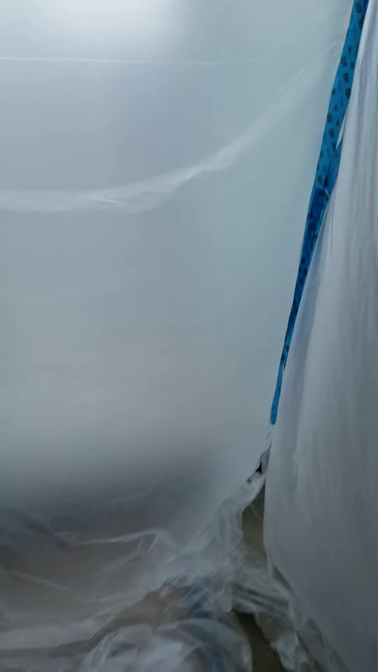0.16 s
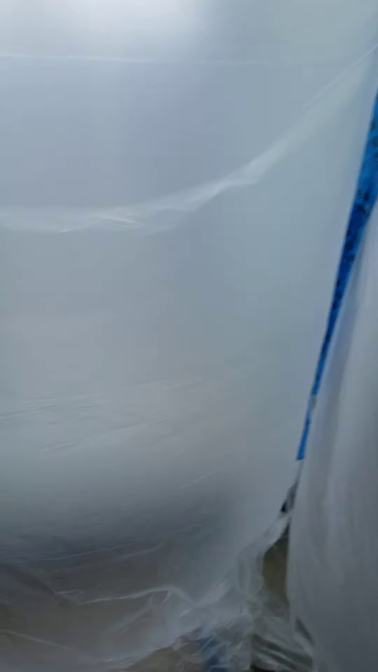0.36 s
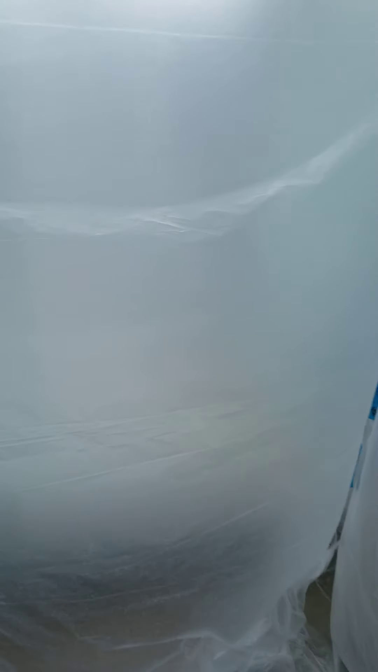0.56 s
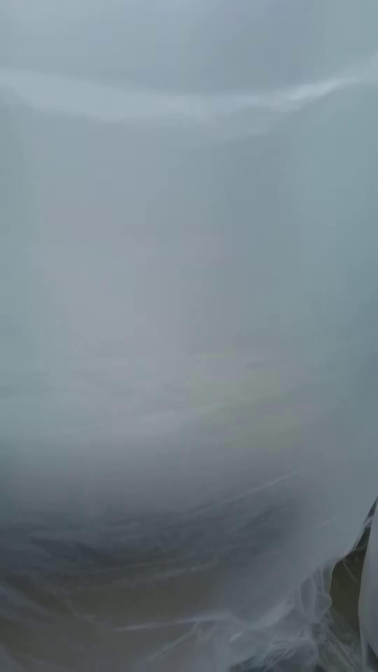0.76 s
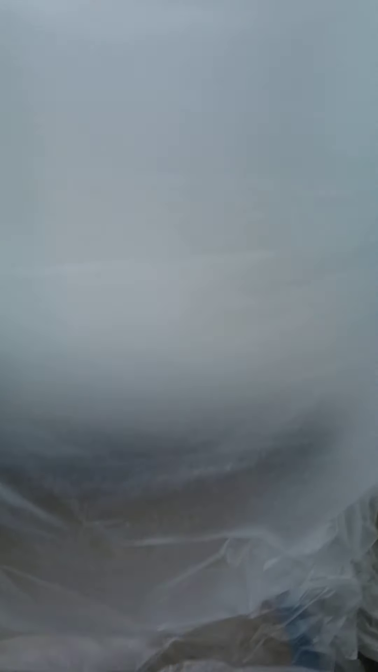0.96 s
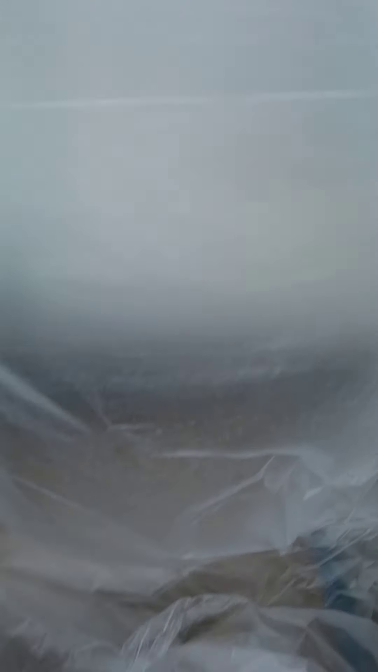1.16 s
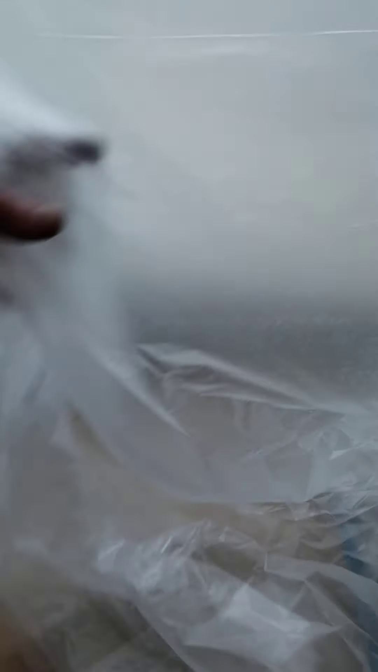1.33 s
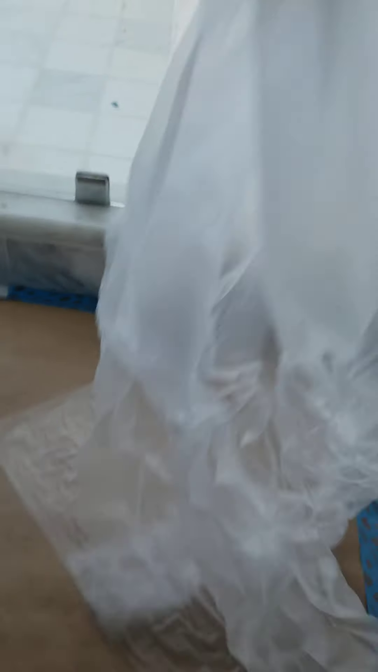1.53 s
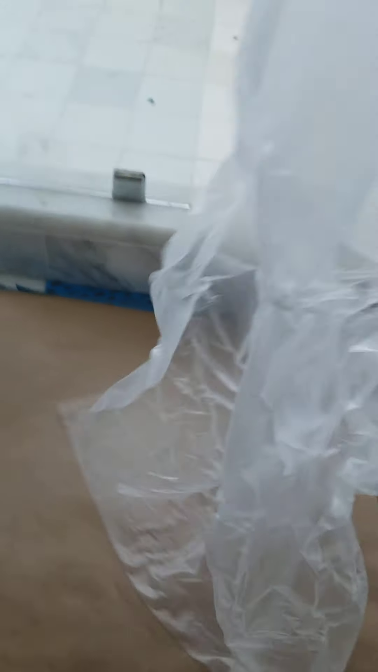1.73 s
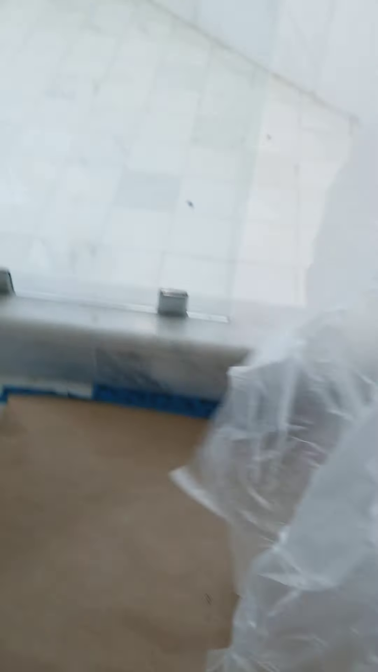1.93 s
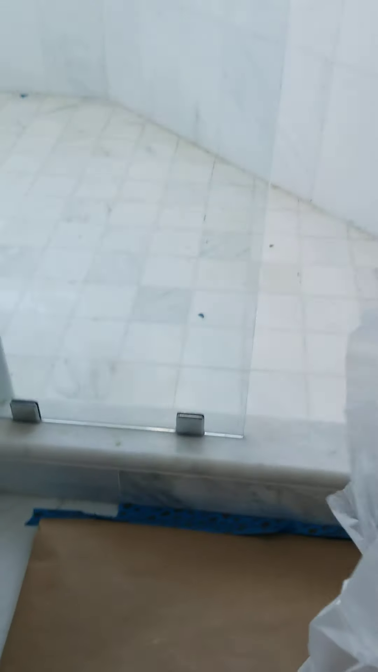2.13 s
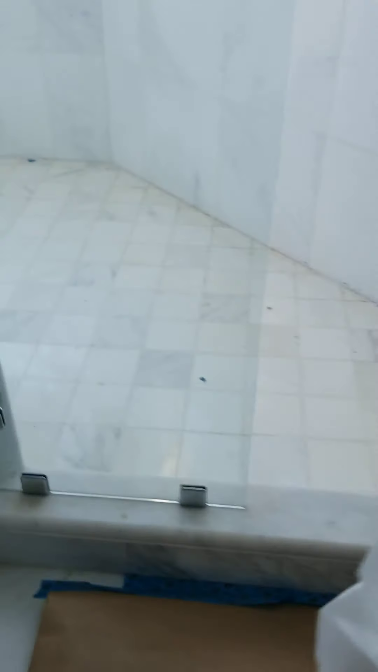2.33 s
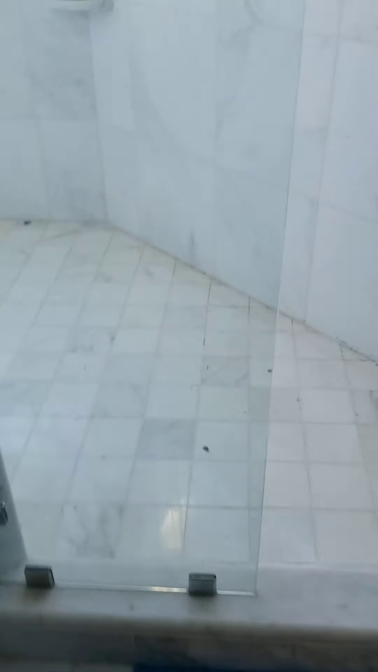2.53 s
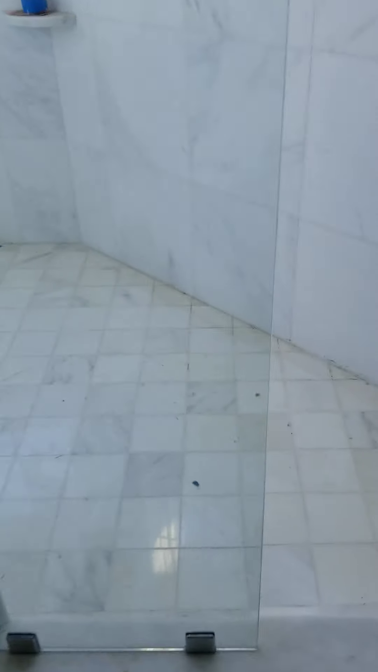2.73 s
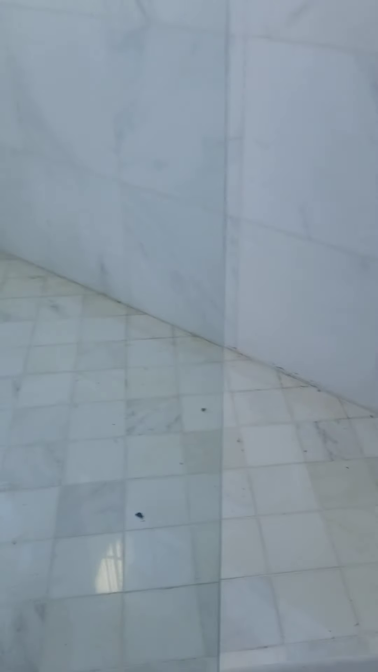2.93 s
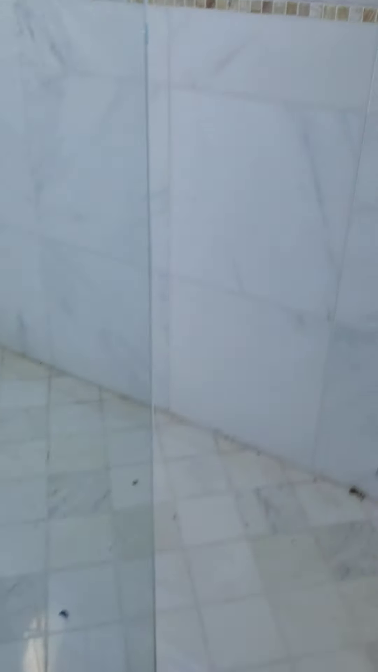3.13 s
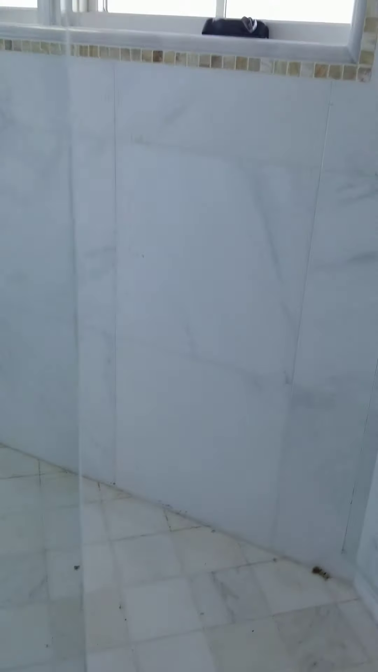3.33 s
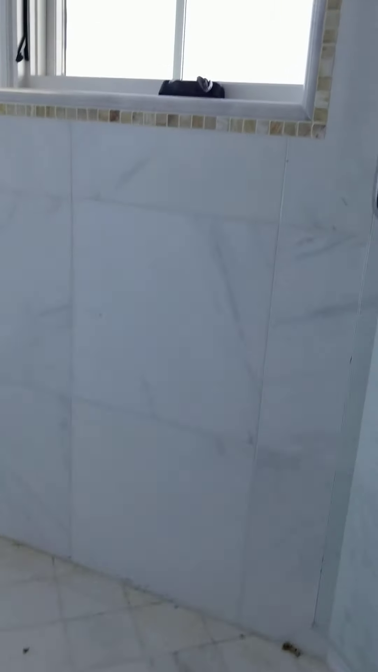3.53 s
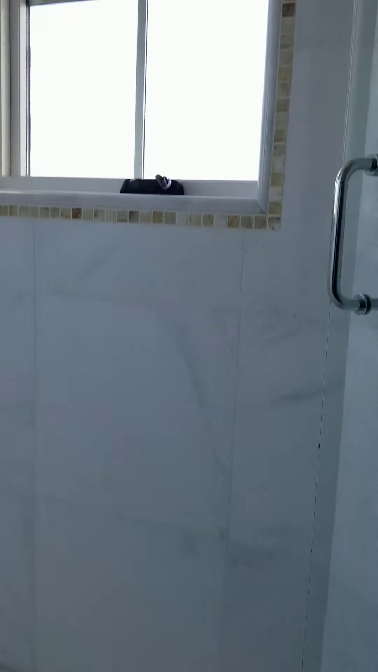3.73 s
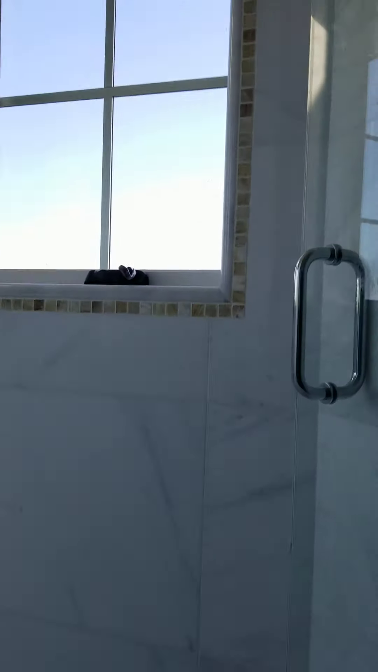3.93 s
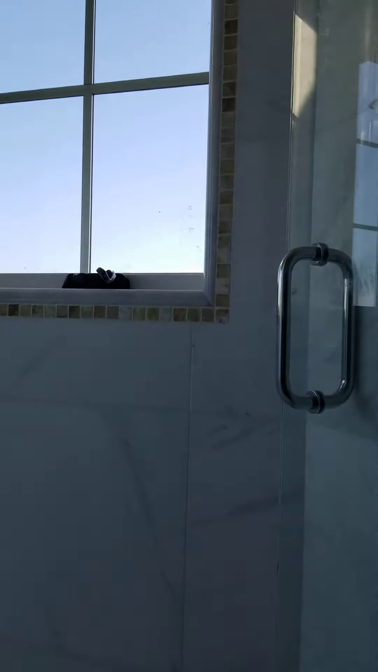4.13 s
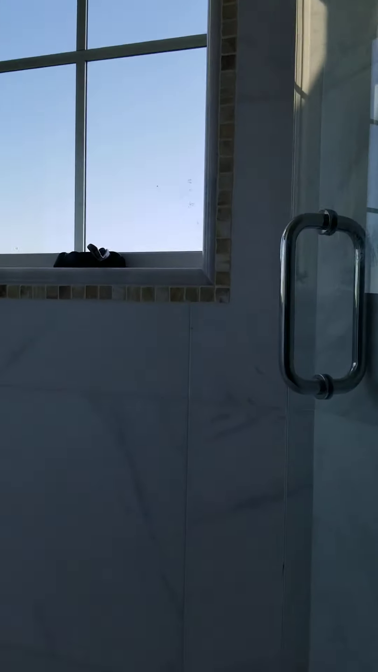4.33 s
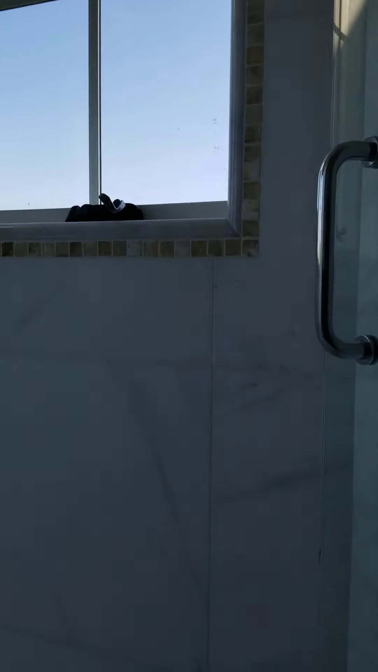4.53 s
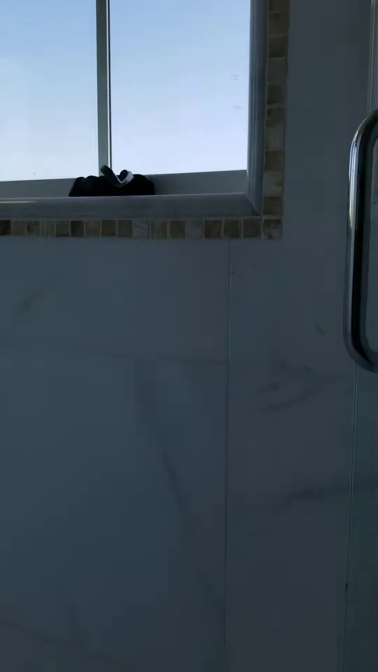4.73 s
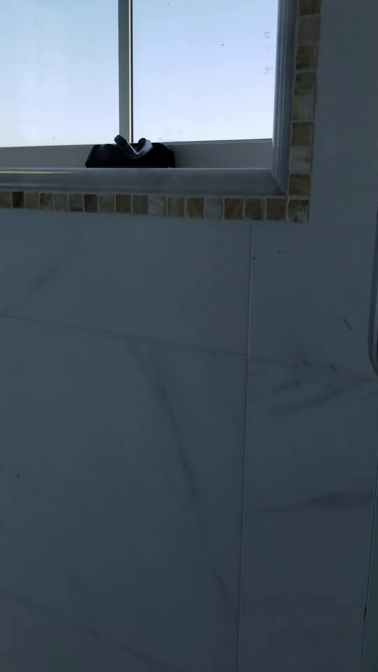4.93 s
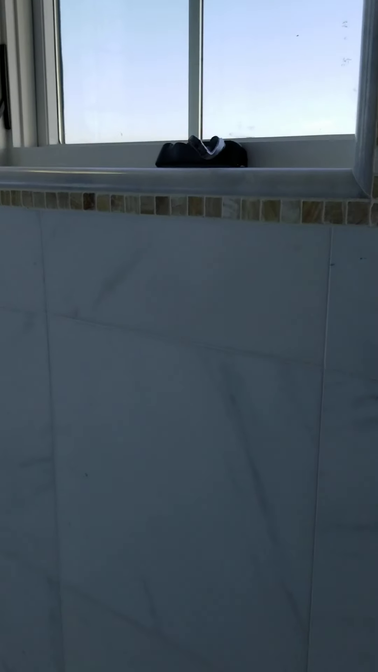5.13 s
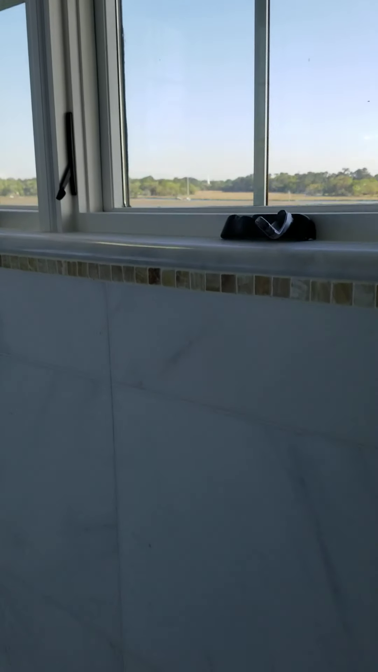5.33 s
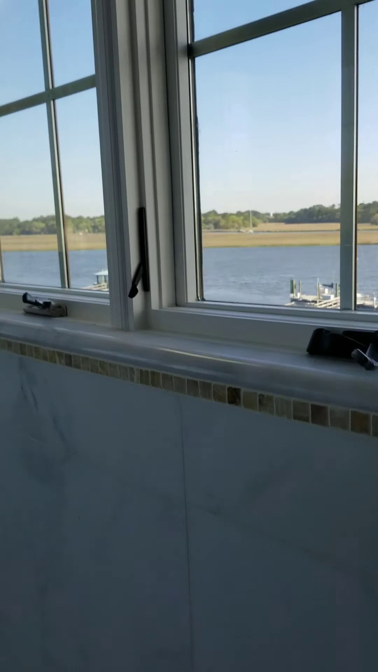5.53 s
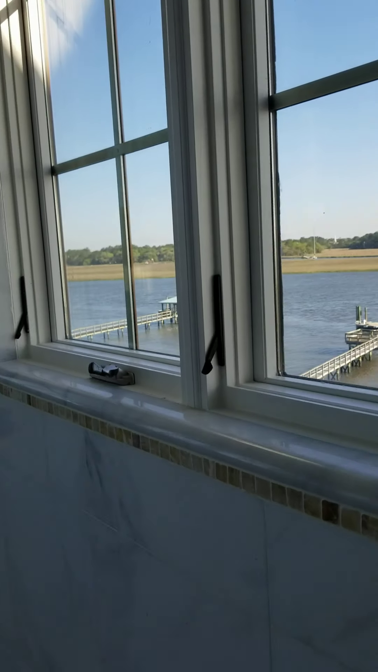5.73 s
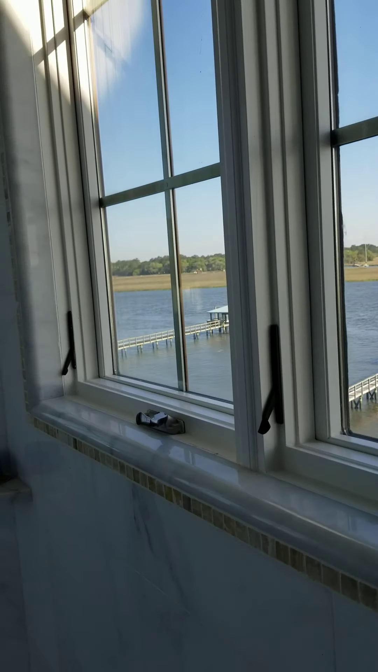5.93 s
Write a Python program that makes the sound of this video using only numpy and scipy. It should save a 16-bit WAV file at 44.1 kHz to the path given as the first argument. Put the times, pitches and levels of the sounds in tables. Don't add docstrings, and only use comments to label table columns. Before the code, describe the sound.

Thin plastic sheeting crackles densely and knocks against a phone as it is pushed aside in a tiled room, then settles with faint rustles.

```python
import sys
import numpy as np
from scipy import signal
from scipy.fft import rfft, irfft, next_fast_len
from scipy.io import wavfile
from scipy.ndimage import uniform_filter1d

SR = 44100
rng = np.random.default_rng(int(sys.argv[2]) if len(sys.argv) > 2 else 0)


def dump_mix(stems):
    frames = np.atleast_2d(stems).T
    limited = np.clip(frames, -1, 1)
    pcm = np.round(limited * 32767).astype(np.int16)
    wavfile.write(sys.argv[1], SR, pcm)


def nominal_scale(level):
    x = np.asarray(level, float) / 20
    return 10 ** x


N = 267758

# pitch in Hz, width in Hz, level in dB, left minus right in dB.
CASE = [
    (490, 90, -2, 3),
    (870, 80, -2, 0),
    (1240, 100, -1, -6),
]
# start in seconds, level in dB, hold in seconds,
# left minus right in dB.
BRUSHES = [(0.86, -58, 0.022, 2), (1.62, -46.5, 0.1, 3), (2.172, -34.5, 0.02, -0.5), (2.21, -37, 0.055, 0),
           (2.66, -29.5, 0.069, 16), (2.8, -37.5, 0.047, 9), (3.31, -44, 0.0094, 7), (4.68, -65, 0.29, -20),
           (5.39, -53, 0.027, 6), (5.73, -54, 0.07, -9)]
BRUSH_RISE_DB_S, BRUSH_FALL_DB_S = 800, 190


def unit(x):
    return x / np.sqrt(np.mean(x ** 2))


def curves(table):
    s, *columns = np.transpose(table)
    t = np.arange(N) / SR
    return [np.interp(t, s, column) for column in columns]


def sides(pan_db):
    return nominal_scale(np.array([pan_db, -pan_db]) / 2)


def colour(x, hz, db):
    size = next_fast_len(N)
    f = np.maximum(np.arange(size // 2 + 1) * SR / size, 1)
    gain = nominal_scale(np.interp(np.log(f), np.log(hz), db))
    gain = gain * np.minimum(f / hz[0], 1) ** 2 * np.minimum(hz[-1] / f, 1) ** 2
    return irfft(rfft(x, size) * gain, size)[..., :N]


def walk(rate_hz):
    k = int(SR / rate_hz)
    steps = np.repeat(rng.standard_normal(N // k + 1), k)
    return 1.18 * uniform_filter1d(uniform_filter1d(steps, k), k)[:N]


def creases(rate_hz, spread_db):
    when = rng.random((2, N))
    sign = rng.standard_normal((2, N))
    size = rng.exponential(size=(2, N))
    return unit((when < rate_hz / SR) * sign * nominal_scale(spread_db * size))


def ring(hz, width_hz, length):
    t = np.arange(length) / SR
    blow = np.minimum(t * hz * 1.1, 1)
    return np.sin(2 * np.pi * hz * t) * np.exp(-np.pi * width_hz * t) * blow


def add(out, s, sound):
    i = int(s * SR)
    out[:, i:i + sound.shape[-1]] += sound[..., :N - i]


def swells(table, rise_db_s, fall_db_s):
    s, db, hold_s, last = np.transpose(table)[:, :, None]
    t = np.arange(N) / SR
    before_s = np.maximum(s - t, 0)
    after_s = np.maximum(t - s - hold_s, 0)
    return nominal_scale(db - rise_db_s * before_s - fall_db_s * after_s), last


def placed(table, rise_db_s, fall_db_s):
    gains, pan_db = swells(table, rise_db_s, fall_db_s)
    return (gains * sides(pan_db)).sum(axis=1)


def house():
    # time in seconds, level in dB.
    hum = [(0.0, -59.5), (0.2, -53.5), (0.55, -55.5), (0.75, -71), (1.5, -68), (2.42, -54), (3.0, -60),
           (3.85, -57), (4.2, -62.5), (4.8, -56.5), (6.07, -54)]
    # frequency in Hz, level in dB.
    hum_colour = [(20, -32), (45, -20), (80, -18), (112, -11), (126, -2), (142, 0), (158, -12), (220, -17),
                  (340, -19), (450, -32)]
    level_db, = curves(hum)
    mid, side = colour(rng.standard_normal((2, N)), *np.transpose(hum_colour))
    ports = mid + 0.068 * side * np.array([[1], [-1]])
    return unit(ports) * nominal_scale(level_db + 1.5 + 1.0 * walk(9.8))


def quiet():
    # frequency in Hz, density in dB per Hz.
    quiet_colour = [(240, -33), (400, -14), (496, -22), (889, -26), (931, -19), (1190, -10), (1590, -1),
                    (2600, 0.5), (3130, -15), (3880, -6), (9170, -14), (12100, -23), (15700, -28)]
    noise = colour(rng.standard_normal((2, N)), *np.transpose(quiet_colour))
    return unit(noise) * nominal_scale(-65.5) * sides(-4.5)[:, None]


def draught():
    # start in seconds, level in dB, hold in seconds, left minus right in dB.
    gusts = [(0.85, -54.5, 0.15, -2), (1.2, -62, 0.03, -3), (1.66, -47, 0.03, 8), (1.76, -43.5, 0.16, 7),
             (2.02, -52, 0.0092, 13), (2.175, -39.5, 0.015, 2), (2.42, -59, 0.024, 10),
             (2.68, -32, 0.037, 1.5), (2.9, -51, 0.018, 9), (3.32, -49, 0.02, 7), (3.61, -58, 0.0091, 14),
             (5.2, -64, 0.018, 6), (5.62, -54, 0.01, 4)]
    # frequency in Hz, level in dB.
    draught_colour = [(15, -21), (40, 2.5), (70, 5), (130, -0.5), (240, -12.5), (380, -15.5)]
    still = nominal_scale(np.where(np.arange(N) / SR < 3.8, -61.5, -59.5))
    gain = still + placed(gusts, rise_db_s=300, fall_db_s=177)
    noise = colour(rng.standard_normal((2, N)), *np.transpose(draught_colour))
    return unit(noise) * nominal_scale(2.0 * walk(30)) * gain


def puffs():
    # time in seconds, push in dB, suction before it in dB, push length in ms.
    puff_rows = [(1.861, -32, -25, 5.8), (1.938, -28, -29, 5.1), (3.76, -27.5, -29, 5),
                 (3.868, -26, -23, 4.1), (3.935, -31.5, -33, 5.3), (4.521, -28, -34, 4),
                 (5.389, -27.5, -30, 4.6), (5.677, -27.5, -23, 4.1)]
    out = np.zeros((2, N))
    t = np.arange(-1500, 1500) / SR
    for s, push_db, suck_db, push_ms in puff_rows:
        u = t / (push_ms / 2000)
        push = np.exp(-np.abs(u / 1.4) ** 3) * (1 - .15 * u)
        suck = np.exp(-((u + 1.52) / np.where(u < -1.4, 1.3, .4)) ** 2)
        rebound = np.exp(-((u - 2.1) / np.where(u > 2.1, 2.2, .7)) ** 2)
        puff = nominal_scale(push_db) * (push - 0.72 * rebound) - nominal_scale(suck_db) * suck
        add(out, s + t[0], puff * np.array([[1], [.05]]))
    return out


def slides():
    # start in seconds, level in dB, hold in seconds, pitch in Hz.
    slide_rows = [
        (0.52, -59, 0.21, 960),
        (1.63, -46, 0.11, 870),
        (2.18, -48, 0.08, 1290),
        (4.58, -46.5, 0.23, 1282),
        (4.86, -51.5, 0.32, 1250),
        (5.72, -55, 0.25, 1280),
    ]
    gains, pitch_hz = swells(slide_rows, rise_db_s=300, fall_db_s=250)
    grains = creases(4000, 1.1) * nominal_scale(0.8 * walk(30))
    case = sum(nominal_scale(db) * ring(hz, width_hz, 1500) for hz, width_hz, db, _ in CASE)
    case = case + ring(1580, 110, 1500)
    out = np.zeros((2, N))
    for gain, hz in zip(gains, pitch_hz[:, 0]):
        note = ring(hz, 55, 1500) + nominal_scale(-5) * case
        out += gain * unit(signal.fftconvolve(grains, note[None], axes=1)[:, :N])
    return out


def knocks():
    # time in seconds, peak in dB, pitch in Hz, left minus right in dB.
    knock_rows = [(1.603, -42, 864, 1), (1.6235, -25, 516, 4), (1.642, -28, 890, 1), (1.688, -25, 877, 9),
                  (1.7212, -25, 870, 5), (1.734, -23.5, 850, -5), (1.7482, -28, 503, 3),
                  (2.17, -17, 475, -1), (2.181, -24, 476, 1), (2.189, -21, 850, 2), (2.193, -15.5, 840, -6),
                  (2.217, -23, 640, 9), (2.24, -22.5, 830, -4), (2.247, -23, 1240, 2), (2.255, -28, 430, 6),
                  (2.654, -31, 656, 10), (2.684, -23, 740, 8), (2.695, -21, 160, 3), (2.718, -17, 147, 0),
                  (2.786, -18.5, 765, 13), (2.854, -27.5, 487, 21), (3.303, -26, 1110, 10),
                  (5.399, -36, 485, -9)]
    out = np.zeros((2, N))
    case = sum(nominal_scale(db) * sides(pan_db)[:, None] * ring(hz, width_hz, 1500) for hz, width_hz, db, pan_db in CASE)
    thud = ring(570, 800, 1500)
    for s, db, hz, pan_db in knock_rows:
        fold = ring(hz, 0.081 * hz + 30, 1500)
        blow = 1.02 * fold + 0.43 * case + 2.2 * thud
        add(out, s + 0.00154, nominal_scale(db - 3.0) * sides(pan_db)[:, None] * blow)
    return out


def snaps():
    # time in seconds, peak in dB, pitch in Hz, left minus right in dB.
    snap_rows = [
        (0.1629, -53, 1900, -5),
        (0.3236, -44, 11800, -17),
        (0.7738, -25.5, 2160, -7),
        (5.212, -37, 1890, -4.0),
        (5.519, -39, 2070, 0),
    ]
    out = np.zeros((2, N))
    for s, db, hz, pan_db in snap_rows:
        spit = rng.standard_normal((2, 600)) * np.exp(-np.arange(600) / SR / 0.0027)
        second_hz = 0.81 * hz if hz < 5000 else 1.15 * hz
        pair = ring(hz, 280, 600) + 0.88 * ring(second_hz, 300, 600)
        add(out, s, nominal_scale(db) * sides(pan_db)[:, None] * (pair + .06 * spit))
    return out


def tiles(x):
    t60_s, tail_db = 0.34, -6.5
    t = np.arange(SR // 2) / SR
    tail = rng.standard_normal((2, len(t))) * np.exp(-np.log(1000) * t / t60_s) * (t > .004)
    tail /= np.sqrt(np.sum(tail ** 2, axis=1, keepdims=True))
    return x + nominal_scale(tail_db) * signal.fftconvolve(x, tail, axes=1)[:, :N]


def motion():
    # time in seconds, crackle level in dB,
    # nearness as treble lift in dB, bearing as left minus right in dB.
    pull_rows = [(1.04, -103, -5, -8), (1.121, -40.5, 0.5, -5), (1.39, -37, 1, -0.5), (1.81, -36, -0.5, 2),
                 (2.3, -38, -0.5, 1.5), (2.37, -33.5, 0.5, 1.5), (2.59, -32.5, 1, 1.5), (2.63, -36, 1.5, 0),
                 (2.93, -37.5, 2.5, -0.5), (3.05, -36.5, -1, -1.5), (3.27, -37.5, 1.5, -3.5),
                 (3.56, -38.5, -1.5, -1), (4.02, -43, -3.5, -5.5), (4.45, -43, 1, -7.5),
                 (4.76, -45.5, -5, -4.5), (5.07, -49, -4, -8), (5.5, -51.5, -4.5, -5), (6.07, -52, -7, -2)]
    # start in seconds, level in dB, hold in seconds, treble lift in dB.
    stir_rows = [(0.0, -56.5, 0.052, -11.5), (0.165, -65, 0.0038, -6), (0.375, -62, 0.0077, -3.5),
                 (0.46, -60, 0.057, -40), (0.64, -64, 0.049, -11), (0.715, -59, 0.086, -2.5),
                 (0.825, -50.5, 0.016, -8), (0.95, -64.5, 0.086, -2)]
    flurry_rows = [(1.595, -53, 0.038, 0), (1.93, -42, 0.027, -3.5), (2.69, -33, 0.04, -1),
                   (3.09, -42, 0.039, -3), (3.31, -38.5, 0.12, 0), (3.66, -53, 0.03, 3),
                   (4.61, -51, 0.017, -6), (5.2, -62, 0.15, 3.5), (5.5, -68, 0.035, -1),
                   (4.18, -62, 0.15, 1), (3.85, -51.5, 0.092, 2), (1.22, -56, 0.071, -1)]
    level_db, lift_db, bearing_db = curves(pull_rows)
    stirs, stir_lift_db = swells(stir_rows, rise_db_s=910, fall_db_s=86)
    flurries, flurry_lift_db = swells(flurry_rows, rise_db_s=498, fall_db_s=79)
    brushes = swells(BRUSHES, BRUSH_RISE_DB_S, BRUSH_FALL_DB_S)[0].sum(axis=0) * nominal_scale(-13.5)
    pull, stir = nominal_scale(level_db), stirs.sum(axis=0)
    bright = pull * nominal_scale(lift_db)
    bright = bright + (stirs * nominal_scale(stir_lift_db)).sum(axis=0)
    bright = bright + (flurries * nominal_scale(flurry_lift_db)).sum(axis=0)
    bright = bright + brushes * nominal_scale(-11)
    stir_bearing_db = -6.5
    bearing_db = (pull * bearing_db + stir * stir_bearing_db) / (pull + stir)
    return pull + stir + flurries.sum(axis=0), brushes, bright, bearing_db


def folds():
    # frequency in Hz, level in dB.
    fold_colour = [(120, -2.5), (250, 1), (370, -1.5), (490, -1), (640, -1.5), (860, -3.5), (1030, -6),
                   (1260, -4.5), (1500, -7.5), (3000, -21), (6000, -33)]
    moving = motion()[0]
    flex = nominal_scale(-12.5) * moving ** 0.86 * sides(0.4)[:, None]
    gain = flex + placed(BRUSHES, BRUSH_RISE_DB_S, BRUSH_FALL_DB_S) * nominal_scale(-4.5)
    clicks = creases(3000, 1.82)
    clicks = clicks + 0.48 * clicks[::-1]
    return unit(colour(clicks, *np.transpose(fold_colour))) * gain * nominal_scale(-1.5 + 1.0 * walk(24.9))


def sheet():
    # frequency in Hz, left in dB, right in dB.
    port_rows = [(870, -6, -10.5), (1490, -4.5, -5), (2340, -1.5, 1), (3450, -1, -3.5), (3770, -0.5, -1.5),
                 (5840, -3, -7), (7330, -9, -6.5), (7630, -1, -5.5), (8920, -11.5, -12.5),
                 (10460, -4.5, -1.5), (12620, -1.5, 4.5), (14350, 4, -6.5), (17400, 0, -2)]
    moving, brushes, bright, bearing_db = motion()
    hz, *port_db = np.transpose(port_rows)
    clicks = creases(15000, 0.56) * nominal_scale(0.82 * walk(9) + 0.41 * walk(60))
    heard = np.array([colour(click, hz, db) for click, db in zip(clicks, port_db)])
    body = signal.sosfiltfilt(signal.butter(3, 4300, fs=SR, output="sos"), heard)
    below = signal.sosfiltfilt(signal.butter(3, 8800, fs=SR, output="sos"), heard)
    edge = unit(below - body) * nominal_scale(-1.33 + 0.53 * walk(14))
    fine = unit(heard - below) * nominal_scale(5.5 + 0.51 * walk(30))
    large = unit(body) * (moving + brushes) + edge * bright
    large = large * sides(-3.5 + 0.33 * bearing_db)
    return nominal_scale(2.5) * (large + fine * bright * sides(bearing_db))


def scene():
    background = house() + quiet()
    air = draught() + puffs()
    blows = tiles(knocks() + snaps())
    return background + air + slides() + blows + folds() + sheet()


def top_cut(x):
    return signal.sosfilt(signal.butter(12, 17060, fs=SR, output="sos"), x)


def record(dry):
    low_pass = signal.ellip(10, .2, 75, 15750, fs=SR, output="sos")
    return top_cut(signal.sosfilt(low_pass, dry))


dry = scene()
out = record(dry)
dump_mix(out)
```